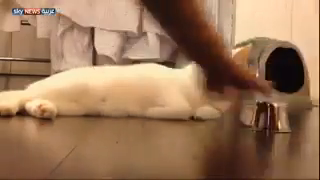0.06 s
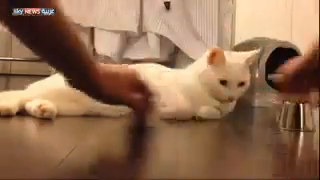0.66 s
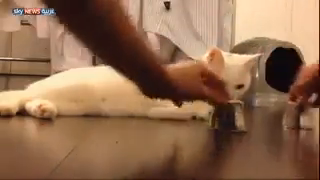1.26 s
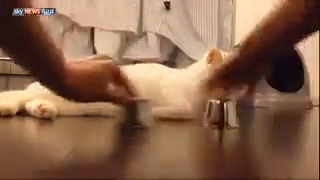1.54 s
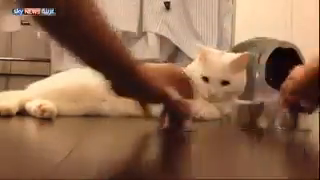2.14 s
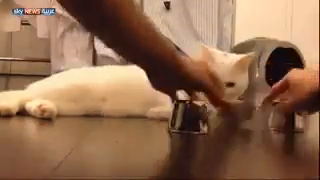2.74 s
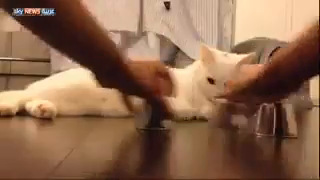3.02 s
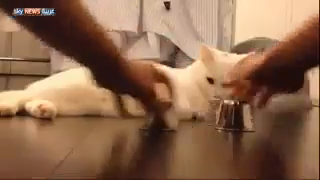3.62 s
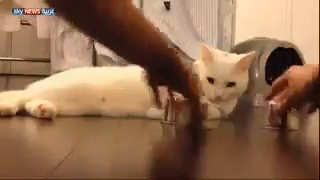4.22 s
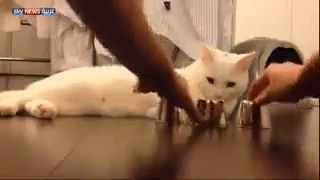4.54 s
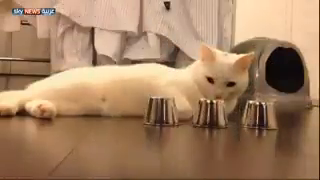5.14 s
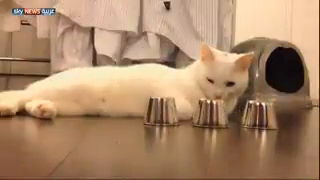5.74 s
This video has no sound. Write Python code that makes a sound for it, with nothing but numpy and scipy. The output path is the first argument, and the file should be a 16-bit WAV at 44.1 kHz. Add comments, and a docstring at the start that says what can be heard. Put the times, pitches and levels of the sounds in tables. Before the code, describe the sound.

From the start, small upturned steel cups are shuffled over a wooden floor, close to the microphone in a small furnished room. The pushes come quickly and overlap, several each second, each a hollow, hissing rasp with a low rumble from the wood. As the rims catch on the grain, the cups sing in short, thin, wavering metallic tones. Rims knock on the wood and cups clink together with a brief high ring, most clearly around 0.5, 1.2, 1.6, 3.2 and 3.7 seconds, with lighter touches in between. From about 4.4 seconds the sliding grows softer, and the cups come to rest at about 4.8 seconds, the sound dying away quickly. The last second holds only quiet room air, a tiny tick near 5.5 seconds and two very faint, high rustles around 5.4 and 5.8 seconds.

```python
"""Three small steel cups, upside down, are shuffled over a wooden top and then come to rest.
Their rims catch on the grain: the board rumbles, the hollow cups rasp, and stick-slip sets the
steel walls singing. Now and then a rim knocks on the wood or two cups clink and ring briefly.
Heard close up in a small furnished room, on one microphone that reaches to about 7 kHz."""
import sys
import numpy as np
from scipy import signal
from scipy.fft import rfft, irfft
from scipy.io import wavfile
from scipy.ndimage import uniform_filter1d

SR = 44100
rng = np.random.default_rng(int(sys.argv[2]) if len(sys.argv) > 2 else 0)


def persist_wave(psi):
    """Save psi, clipped to +-1, as 16-bit WAV."""
    counts = np.round(np.clip(psi, -1, 1) * 32767).astype(np.int16)
    wavfile.write(sys.argv[1], SR, np.atleast_2d(counts).T)


N = 263850
T = np.arange(N) / SR
MIC_TOP_HZ = 6950


def undb(db):
    """Decibels to gain."""
    return 10 ** (np.asarray(db) / 20)


def unit(x):
    """Scale to rms 1."""
    return x / np.sqrt(np.mean(x ** 2))


def peak(x):
    """Scale to peak 1."""
    return x / np.abs(x).max()


def add(out, start_s, sound):
    """Mix a sound in at the given time."""
    i = int(start_s * SR)
    out[i:i + len(sound)] += sound[:N - i]


def walk(per_s):
    """Smooth random wandering of rms 1."""
    step = max(int(SR / per_s), 1)
    stairs = np.repeat(rng.standard_normal(N // step + 1), step)
    return unit(uniform_filter1d(stairs, step)[:N])


def colour(x, spectrum, size=2048):
    """Minimum-phase filter of unit energy, shaped by (freq_hz, level_db) points."""
    hz, db = np.transpose(spectrum)
    bins_hz = np.arange(size // 2 + 1) * SR / size
    curve_db = np.interp(np.log(bins_hz + 1), np.log(hz), db) - 30 * (bins_hz > 2 * MIC_TOP_HZ)
    cepstrum = irfft(np.log(undb(curve_db)))
    cepstrum[1:size // 2] *= 2
    cepstrum[size // 2 + 1:] = 0
    impulse = irfft(np.exp(rfft(cepstrum)))
    return signal.fftconvolve(x, impulse / np.linalg.norm(impulse))[:len(x)]


def band_limit(x):
    """Steep low-pass at the top of the microphone's range."""
    return signal.sosfilt(signal.ellip(10, .2, 75, MIC_TOP_HZ, fs=SR, output="sos"), x)


def resonate(x, hz, width_hz, drift_hz=0):
    """One mode whose pitch may drift; it passes no steady push."""
    pole = np.exp((2j * np.pi * hz - np.pi * width_hz) / SR)
    ring = signal.lfilter([1, -1], [1, -pole], x)
    return (ring * np.exp(2j * np.pi * np.cumsum(drift_hz) / SR)).imag


def catches(per_s, spread_db):
    """Tiny catches of a rim on the grain: random clicks, more uneven as the spread grows."""
    size = undb(spread_db * np.minimum(rng.exponential(size=N), 4.2))
    return unit((rng.random(N) < per_s / SR) * size * rng.choice([-1, 1], N))


def burst(t, t60, tail_db, tail_t60):
    """A short crack of contact followed by a weaker rattle."""
    return rng.standard_normal(len(t)) * (undb(-60 * t / t60) + undb(tail_db - 60 * t / tail_t60))


def swell(start, end, attack_s, sag_db_per_s, t60):
    """Gain of one gesture: it takes hold, eases off and dies away after its end."""
    age = np.maximum(T - start, 0)
    release_db = 60 * np.clip(T - end, 0, 2 * t60) / t60
    return np.minimum(age / attack_s, 1) * undb(-sag_db_per_s * age - release_db)


def room_tone():
    """The quiet room: steady noise, mostly low."""
    # room air: freq_hz, level_db
    air_spectrum = [(25, -30.5), (40, -23), (50, -8.5), (65, -26.5), (95, -18), (130, -8.5), (187, 1),
                    (230, -2), (450, -13.5), (800, -20.5), (1500, -24.5), (3000, -27.5), (5000, -31),
                    (7000, -34)]
    return unit(band_limit(colour(rng.standard_normal(N), air_spectrum, size=8192))) * undb(-61)


def reflections(x, t60, low_t60, wet_db):
    """The short tail of a small furnished room; the lows linger."""
    t = T[:SR]
    noise = rng.standard_normal(SR) * (t > .004)
    low = signal.sosfilt(signal.butter(2, 1100, fs=SR, output="sos"), noise)
    tail = noise * undb(-60 * t / t60) + low * undb(-5 - 60 * t / low_t60)
    return signal.fftconvolve(x, tail / np.linalg.norm(tail))[:N] * undb(wet_db)


def rustles():
    """Faint, high rustles swell and fade after the cups stop."""
    # each rustle: middle_s, length_s, level_db
    swells = [(5.391, 0.16, -70.5), (5.811, 0.24, -70)]
    # their colour: freq_hz, level_db
    spectrum = [(2000, -20), (3300, -9), (4400, 0), (5200, -5), (6500, -20)]
    gain = sum(undb(db) * np.exp(-2 * ((T - middle) / length) ** 2) for middle, length, db in swells)
    return gain * unit(colour(catches(per_s=5500, spread_db=2.5), spectrum))


def knocks():
    """A rim tips and drops on the wood: one hard rap, a little rattle and a thud from the board."""
    # rim on wood: time_s, level_db, thud_weight_db
    drops = [(0.2579, -15.5, -8), (0.263, -18, -10), (0.279, -19.5, -8), (0.448, -23, -14),
             (0.5225, -9, -30), (0.536, -17, -33), (1.1925, -13, -12), (1.2175, -7, -22), (1.245, -15, -20),
             (1.413, -20, -21), (1.609, -14.5, -11), (1.642, -15, -18), (2.001, -16, -16), (2.292, -27, -8),
             (2.775, -23, -17), (2.797, -24, -18), (3.097, -19, -14), (3.1388, -9, -14),
             (3.1575, -8.5, -24), (3.171, -18, -18), (3.2445, -14, -24), (3.3, -21, -20), (3.3845, -15, -7),
             (3.7034, -16, -14), (3.7255, -13, -22), (4.193, -16, -6), (4.357, -24, -1), (4.594, -28, -14),
             (4.806, -26, -16), (4.937, -46, 1), (5.469, -55, 3)]
    # colours of the rim's rap and the board's thud: freq_hz, level_db
    rap_spectrum = [(200, -26), (500, -15), (950, 5), (1500, -0.5), (2200, 4.5), (2800, 11), (3600, -3.5),
                    (5000, -9), (7000, -18)]
    thud_spectrum = [(45, -24), (90, -31.5), (150, -16), (240, -2.5), (420, 5), (640, 3.5), (2000, -48.5)]
    out, t = np.zeros(N), T[:SR // 5]
    blow = np.zeros(len(t))
    blow[SR // 1000] = 1  # the rim bites a millisecond after it first touches
    rap = peak(band_limit(colour(blow, rap_spectrum))) * undb(-4)
    for time_s, db, thud_db in drops:
        rattle = peak(colour(burst(t, t60=0.0081, tail_db=-9.5, tail_t60=0.041), rap_spectrum))
        thud = peak(colour(burst(t, t60=0.06, tail_db=-14, tail_t60=0.053), thud_spectrum))
        add(out, time_s, undb(db) * (rap + undb(-12.5) * rattle + undb(thud_db - 4.5) * thud))
    return out


def clinks():
    """Two cups touch: a bright tick, a lower clack, a brief high ring and one mode that rings on."""
    # steel on steel: time_s, level_db, tick_hz, clack_weight_db, lingering_hz, lingering_db
    touches = [(0.019, -37, 5400, -10, 5414, -40), (0.4484, -14, 4270, -16.5, 5414, -35),
               (0.701, -26, 5400, -3, 5414, -50), (1.192, -13, 6000, -4.5, 5414, -30.5),
               (1.247, -18.5, 4680, -7, 5720, -45.5), (1.609, -8, 5870, -8.5, 5669, -36),
               (1.631, -11.5, 5700, -6, 6659, -40), (1.642, -12.5, 5050, -2.5, 4992, -33),
               (1.771, -33.5, 6200, -11.5, 6659, -44.5), (1.78, -18.5, 5250, -24, 6659, -55.5),
               (1.8633, -18, 5270, -11.5, 5414, -45.5), (2.2912, -16.5, 4080, -5, 5206, -53),
               (2.333, -25, 4400, -6.5, 5206, -57), (2.352, -22, 4100, -9, 5206, -54),
               (2.37, -23, 4100, 2, 5230, -46.5), (2.805, -17.5, 4500, -6, 5410, -32),
               (2.9445, -28.5, 5550, -1.5, 5410, -29), (3.1584, -22, 4200, -10, 3698, -41),
               (3.2445, -24.5, 4200, 1, 5641, -58), (3.7038, -13.5, 5330, -6, 5440, -34.5),
               (3.749, -14, 5440, -8, 5410, -31), (3.757, -21, 5300, -6.5, 5206, -34.5),
               (4.006, -26.5, 4200, -3.5, 3698, -47), (4.3569, -22, 6500, -4, 5414, -34),
               (4.4121, -25, 6040, -5, 5414, -38.5), (4.476, -22, 5370, -12.5, 5414, -44),
               (4.541, -25, 5350, -18, 5414, -43.5), (4.561, -25, 5500, -18, 3698, -52),
               (4.7134, -42, 5450, 5, 4992, -52), (5.469, -50, 4560, -4, 5414, -84)]
    # modes of the brief ring: pitch_hz, level_db, t60_s
    brief_modes = [(4204, -9, .015), (4780, -16, .05), (4992, -21, .2), (5206, -21, .2), (5414, -21, .2),
                   (5669, -20, .3), (6026, -7, .035), (6210, -6, .02), (6480, -9, .015), (6659, -18, .14)]
    # wall modes that can ring on: pitch_hz
    lingering_modes = [3698, 4992, 5206, 5414, 5641, 5670, 6659]
    # colour of the clack: freq_hz, level_db
    clack_spectrum = [(100, -31.5), (800, -13.5), (2000, -2.5), (2900, 20.5), (3800, -4.5), (6000, -27)]
    slope_db_per_octave, lingering_t60 = 31, .36
    out, t = np.zeros(N), T[:SR // 2]
    for time_s, db, tick_hz, clack_db, lingering_hz, lingering_db in touches:
        # a tick is strongest around its centre, which depends on where the cups meet
        falloff_db = lambda hz: -slope_db_per_octave * abs(np.log2(hz / tick_hz))
        ring = np.zeros(len(t))
        for hz, mode_db, t60 in brief_modes:
            struck_db = mode_db + falloff_db(hz) + 2 * rng.standard_normal()
            ring += undb(struck_db - 60 * t / t60) * np.sin(2 * np.pi * hz * t) * rng.choice([-1, 1])
        tick_spectrum = [(hz, falloff_db(hz)) for hz in (tick_hz / 10, tick_hz, tick_hz * 2)]
        tick = colour(burst(t, t60=0.008, tail_db=-29.5, tail_t60=0.091), tick_spectrum)
        clack = colour(burst(t, t60=0.0038, tail_db=-36.5, tail_t60=0.097), clack_spectrum)
        bright = undb(-6) * peak(band_limit(tick)) + undb(-10) * peak(ring)
        nearest_hz = min(lingering_modes, key=lambda hz: abs(hz - lingering_hz))
        lingering = undb(lingering_db - 60 * t / lingering_t60) * np.sin(2 * np.pi * nearest_hz * t)
        add(out, time_s, undb(db) * (bright + undb(clack_db) * peak(clack)) + lingering)
    return out


def gripping(grips, stir):
    """Gain and roughness of a wall mode: each grip swells it above the ragged stir of scraping."""
    power = ragged_power = stir ** 2 + 1e-18
    for start, end, db, rough in grips:
        grip_power = (undb(db) * swell(start, end, attack_s=0.018, sag_db_per_s=15, t60=0.24)) ** 2
        power = power + grip_power
        ragged_power = ragged_power + rough * grip_power
    return np.sqrt(power), ragged_power / power


def stick_slip(gain, modes, rough, wander_hz, flutter_db):
    """A rim locks unsteadily onto a cup's wall modes; stray catches make the rough share of the tone."""
    out, rough = np.zeros(N), np.clip(rough, 0, 1)
    for hz, db, t60 in modes:
        pitch_hz = hz + wander_hz * walk(30)
        locked = np.sqrt(2) * np.sin(2 * np.pi * np.cumsum(pitch_hz) / SR)
        width_hz = np.log(1000) / (np.pi * t60)
        stray = unit(resonate(catches(per_s=600, spread_db=0), hz, width_hz))
        tone = locked * np.sqrt(1 - rough) + stray * np.sqrt(rough)
        out += undb(db + flutter_db * walk(55)) * tone
    return out * gain


def cup_song(rasp_gain, hiss_gain):
    """The cups sing on their wall modes as the rims grip, with fainter modes sounding along."""
    # wall modes by name (twins lie close and beat): pitch_hz, t60_s, stir_db relative to the rasp
    wall_modes = {"ring": (2896, .25, -19), "ring twin": (2860, .2, -20), "low ring": (2547, .4, -22),
                  "chime": (3698, .35, -26), "shimmer": (5670, .5, -27), "shimmer twin": (5641, .4, -33),
                  "whistle": (5413, .35, -22), "top": (6659, .5, -38)}
    # grips of a rim, by mode name: start_s, end_s, level_db, roughness (0-1)
    grips = { "ring": [(.35, .42, -46, .05), (.55, .6, -41, .05), (.61, .675, -34.5, 0.05),
             (.98, 1.06, -41, 0.2), (1.07, 1.16, -36.5, 0.17), (1.228, 1.275, -24.5, 0.09),
             (1.31, 1.4, -37, 0), (1.612, 1.685, -22.5, 0), (1.69, 1.735, -27.5, 0), (1.92, 1.97, -29.5, 0),
             (2.075, 2.115, -30.5, 0.25), (2.16, 2.32, -35.5, 0), (2.375, 2.48, -27, 0.01),
             (2.49, 2.57, -36, .1), (2.58, 2.62, -29, 0), (2.65, 2.81, -33.5, 0.08),
             (3.025, 3.065, -29, 0.1), (3.11, 3.24, -34.5, 0.2), (3.27, 3.41, -36.5, 0.1),
             (3.415, 3.52, -28.5, 0), (3.56, 3.7, -36, 0.1), (3.73, 3.8, -33.5, 0.05),
             (4.08, 4.16, -33.5, 0.37), (4.16, 4.265, -32.5, 0.2), (4.34, 4.52, -45.5, 0.14)],
             "ring twin": [(.515, .548, -30, 0.1), (.56, .675, -39, .05), (.97, 1.03, -38.5, 0.05),
             (1.21, 1.25, -42, 0.2), (2.12, 2.19, -34.5, 0.2), (2.435, 2.48, -27, 0.2),
             (2.785, 2.84, -31.5, 0), (2.88, 2.93, -41.5, .1), (3.02, 3.1, -34, 0.2),
             (3.136, 3.156, -23.5, 0.1), (3.187, 3.24, -31, 0), (3.29, 3.45, -43.5, 0.15),
             (3.74, 3.778, -28.5, 0), (3.9, 4, -41.5, 0.06), (4.08, 4.14, -34.5, .2),
             (4.195, 4.255, -31.5, 0), (4.3, 4.35, -32.5, 0.25), (4.355, 4.425, -28, 0.1)],
             "low ring": [(.34, .42, -41.5, 0.06), (2.285, 2.34, -34, 0.1), (2.44, 2.515, -31.5, .1),
             (2.645, 2.68, -38, .1), (2.755, 2.8, -39.5, 0), (2.86, 2.96, -35.5, 0.11),
             (2.965, 3.035, -30.5, 0), (3.375, 3.405, -30, .1), (3.43, 3.7, -38, 0.1),
             (3.71, 3.87, -37.5, 0), (3.885, 3.985, -35.5, 0.06)], "chime": [(1.48, 1.66, -44.5, .2),
             (2.03, 2.16, -50, 0), (2.36, 2.5, -50, 0), (2.95, 3.12, -47, 0.2), (3.135, 3.25, -47, .1),
             (3.3, 3.55, -52.5, 0.2), (3.745, 3.9, -46.5, .05), (4.08, 4.28, -54.5, .15),
             (4.365, 4.45, -38, 0), (4.47, 4.56, -49.5, 0.14)], "shimmer": [(1.2, 1.31, -40.5, .02),
             (1.61, 1.69, -38, 0.14), (1.72, 1.8, -54.5, .1), (2.125, 2.18, -46.5, 0.03),
             (2.38, 2.52, -47, 0.3), (2.54, 2.68, -56.5, .1), (3.08, 3.35, -52, 0.2),
             (4.06, 4.2, -52, 0.1)], "shimmer twin": [(3.08, 3.33, -45.5, 0), (3.42, 3.54, -46, 0.08),
             (4.17, 4.35, -50, .3)], "whistle": [(.01, .12, -40.5, 0), (.16, .37, -49, 0.3),
             (.45, .52, -43, 0), (.545, .6, -43.5, 0.08), (.69, .88, -47, 0.3), (.97, 1.15, -47, 0.05),
             (1.25, 1.32, -44.5, .02), (1.46, 1.53, -54.5, 0.3), (1.65, 1.72, -47.5, .1),
             (1.92, 1.99, -43.5, 0), (2.19, 2.28, -46.5, 0.07), (2.385, 2.47, -41.5, .05),
             (2.99, 3.05, -58, .3), (3.08, 3.17, -50, .25), (3.79, 3.87, -47, 0.2),
             (4.365, 4.42, -40, 0.14), (4.45, 4.59, -50, 0.2)], "top": [(.03, .17, -53, 0.2),
             (.27, .32, -49, 0.01), (1.8, 2, -56, .2)]}
    # fainter modes that follow the ring, the low ring and the hiss: pitch_hz, weight_db, t60_s
    ring_overtones = [(4992, -26, .4), (6659, -30, .5), (6026, -32, .4), (3392, -27, .3)]
    low_overtones = [(5206, -17, .5), (3392, -20, .4)]
    whistles = [(3698, -9, .25), (5206, -17, .3)]
    out, gains = np.zeros(N), {}
    for name, (hz, t60, stir_db) in wall_modes.items():
        gains[name], rough = gripping(grips[name], rasp_gain * undb(stir_db))
        out += stick_slip(gains[name], [(hz, 0, t60)], rough, wander_hz=5.5, flutter_db=1.6)
    ring_gain = np.hypot(gains["ring"], gains["ring twin"])
    for gain, modes in [(ring_gain, ring_overtones), (gains["low ring"], low_overtones)]:
        out += stick_slip(gain * undb(-6), modes, rough=.4, wander_hz=6.7, flutter_db=1.5)
    return out + stick_slip(hiss_gain * undb(-3.5), whistles, rough=.34, wander_hz=8, flutter_db=3.5)


def pushes():
    """Hands push the cups, then stop them: gains of rumble, rasp and hiss, and the rasp's tilt in dB."""
    # one push over the wood: start_s, end_s, rumble_db, rasp_db, hiss_db, brightness_db
    strokes = [(-.02, 0.117, -37, -33, -41, 1.5), (0.126, 0.265, -39, -36.5, -43, -1.5),
               (0.236, 0.27, -35.5, -33.5, -39.5, 0), (0.316, 0.43, -36.5, -37, -52.5, -1.5),
               (0.433, 0.613, -38.5, -31.5, -45, 2), (0.633, 0.753, -39, -39.5, -42, 1.5),
               (0.757, 0.895, -37, -35.5, -48.5, -1), (0.87, 1.02, -35.5, -40, -45.5, 2.5),
               (1.053, 1.124, -38.5, -37.5, -46, 4), (1.18, 1.271, -39.5, -31.5, -42, -1.5),
               (1.298, 1.353, -43, -37, -58.5, -4), (1.392, 1.468, -40.5, -29.5, -46.5, 1.5),
               (1.468, 1.6, -37, -32, -40, 2), (1.593, 1.769, -35, -33, -39.5, -3),
               (1.819, 1.89, -37.5, -32, -45, 0), (1.897, 2.072, -37.5, -33.5, -46.5, 0.5),
               (2.07, 2.143, -39, -33.5, -41, 0.5), (2.177, 2.295, -38.5, -42.5, -51.5, -1),
               (2.284, 2.374, -37.5, -35.5, -43, 2), (2.373, 2.518, -36.5, -34.5, -43, 1.5),
               (2.534, 2.757, -41, -36.5, -53, 0.5), (2.751, 2.892, -39, -33.5, -44.5, 2.5),
               (2.91, 3.016, -40, -40, -44, 3.5), (3.01, 3.136, -37, -33.5, -42, -2.5),
               (3.141, 3.18, -42, -33, -45, 3), (3.222, 3.368, -42, -36.5, -45, 1),
               (3.378, 3.411, -39, -28.5, -40, -0.5), (3.453, 3.555, -38, -35, -45.5, 1.5),
               (3.573, 3.69, -41, -41.5, -51, 0.5), (3.695, 3.754, -37.5, -31.5, -40.5, -0.5),
               (3.793, 3.948, -39.5, -40.5, -48.5, 0), (3.996, 4.102, -41.5, -36, -56, 1),
               (4.074, 4.169, -46, -34.5, -39, -3.5), (4.15, 4.294, -37, -34, -46.5, 2.5),
               (4.31, 4.425, -38, -36.5, -42.5, 0.5), (4.44, 4.595, -43.5, -41, -53.5, -3),
               (4.617, 4.703, -47, -45.5, -73, 4.5), (4.666, 4.808, -40, -40, -69, -1)]
    rest_s, rest_t60 = 4.84, .36
    power, speed, bright_db = np.zeros((3, N)), np.zeros(N), np.zeros(N)
    for start, end, *levels_db, push_bright_db in strokes:
        push = swell(start, end, attack_s=0.022, sag_db_per_s=7.5, t60=0.48)
        power += undb(levels_db)[:, None] ** 2 * push ** 2
        bright_db += push_bright_db * push
        during = (T > start) & (T < end)
        speed[during] = np.maximum(speed[during], np.sin(np.pi * (T[during] - start) / (end - start)))
    moving = undb(-60 * np.clip(T - rest_s, 0, rest_t60) / rest_t60)
    tilt_db = bright_db + 3.5 + 1.5 * speed  # brighter in mid-stroke, where a cup is fastest
    return *(np.sqrt(power) * moving), tilt_db


def shifting_resonances(x, modes):
    """Narrow resonances come and go and drift in pitch as the cups tilt and travel."""
    return sum(undb(db + 3.5 * walk(9)) * unit(resonate(x, hz, width_hz, drift_hz * walk(8)))
               for hz, width_hz, db, drift_hz in modes)


def sliding(rumble_gain, rasp_gain, hiss_gain, tilt_db):
    """Dragged rims chatter: the catches shake the board, rasp in the hollow cups and hiss at the edge."""
    # colours of the board's low and high modes, the rasp and the hiss: freq_hz, level_db
    low_spectrum = [(40, -30.5), (90, -44), (150, -43.5), (190, -4.5), (240, 2), (310, 4.5), (380, 5),
                    (600, -18.5), (2000, -51.5)]
    high_spectrum = [(60, -56.5), (200, -23), (320, 0), (420, 6), (520, 5.5), (640, -5.5), (900, -35.5),
                     (2000, -45.5)]
    rasp_spectrum = [(300, -58), (620, -3.5), (780, 8), (900, 10.5), (1080, 7.5), (1350, -0.5),
                     (1750, -3.5), (2050, 1), (2400, 1), (2850, 1), (3300, -9.5), (4200, -16),
                     (7000, -43.5)]
    hiss_spectrum = [(1500, -33), (2800, -6.5), (3500, 7.5), (4500, 5.5), (5100, 1), (5500, 3),
                     (6200, -1.5), (6900, -9.5)]
    # the board answers deeper in some places than in others: time_s, low_weight_db
    board_depth = [(0, -5.5), (.9, -8.5), (1.3, -7), (1.7, -7.5), (2.3, -3.5), (2.7, -5), (3.1, 7),
                   (3.5, -2), (3.9, -2.5), (4.4, -7), (4.8, -12.5)]
    # resonances of the board and of the hollow cups: pitch_hz, width_hz, level_db, drift_hz
    board_modes = [(315, 24, -18, 25), (420, 18, -13, 16), (497, 20, -15, 10)]
    hollow_modes = [(904, 47, -17.5, 40), (1030, 34, -19, 55), (2048, 21, -12.5, 35), (2270, 95, -16, 170),
                    (2640, 90, -21.5, 100)]
    chatter = undb(0.84 * walk(45) + walk(400))
    heavy = catches(per_s=2500, spread_db=2)
    coarse = catches(per_s=3200, spread_db=1.12) * chatter
    fine = catches(per_s=6000, spread_db=3.5) * chatter

    rasp = unit(colour(coarse, rasp_spectrum))
    hollow = signal.sosfiltfilt(signal.butter(2, 1500, fs=SR, output="sos"), rasp)
    tilted = hollow / undb(tilt_db) + (rasp - hollow) * undb(tilt_db)
    rasp = undb(-0.85) * tilted + shifting_resonances(coarse, hollow_modes)

    depth = undb(np.interp(T, *np.transpose(board_depth)))
    board_low = depth * unit(colour(heavy, low_spectrum))
    board_high = undb(-1) * unit(colour(coarse, high_spectrum))
    rumble = (board_low + board_high) / np.sqrt(depth ** 2 + 2) + shifting_resonances(heavy, board_modes)

    hiss = unit(band_limit(colour(fine, hiss_spectrum)))
    scrape = rumble * rumble_gain + rasp * rasp_gain + hiss * hiss_gain
    # such light cups hardly move the board in the deep bass
    return signal.sosfilt(signal.butter(3, 115, "high", fs=SR, output="sos"), scrape)


def scene():
    """Scraping, singing and contacts of the cups, close by, over the quiet room."""
    rumble_gain, rasp_gain, hiss_gain, tilt_db = pushes()
    contacts = sliding(rumble_gain, rasp_gain, hiss_gain, tilt_db) + clinks() + knocks()
    room = room_tone() + reflections(contacts, t60=0.24, low_t60=0.59, wet_db=-10.5)
    return (room + contacts + cup_song(rasp_gain, hiss_gain) + rustles())[None]


def record(dry):
    """The microphone passes nothing above about 7 kHz."""
    return band_limit(dry)


dry = scene()
out = record(dry)
persist_wave(out)
```